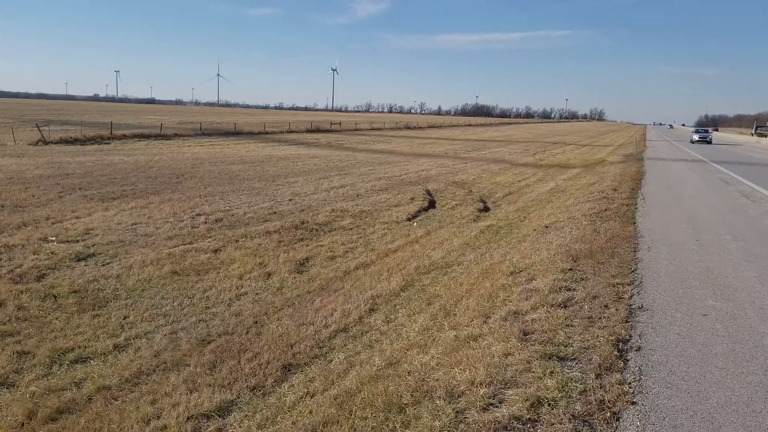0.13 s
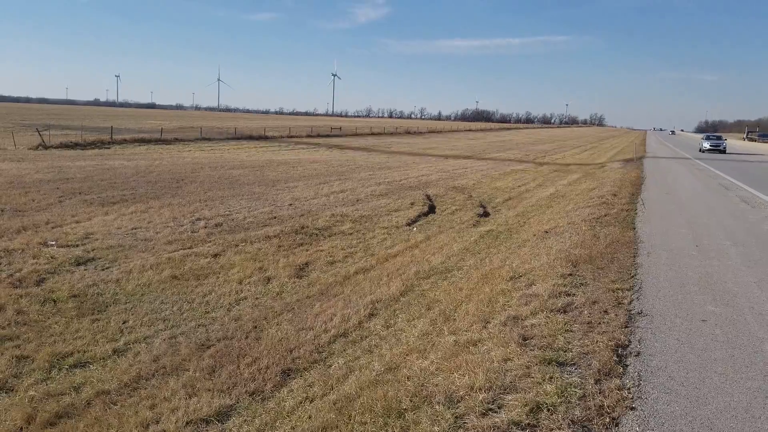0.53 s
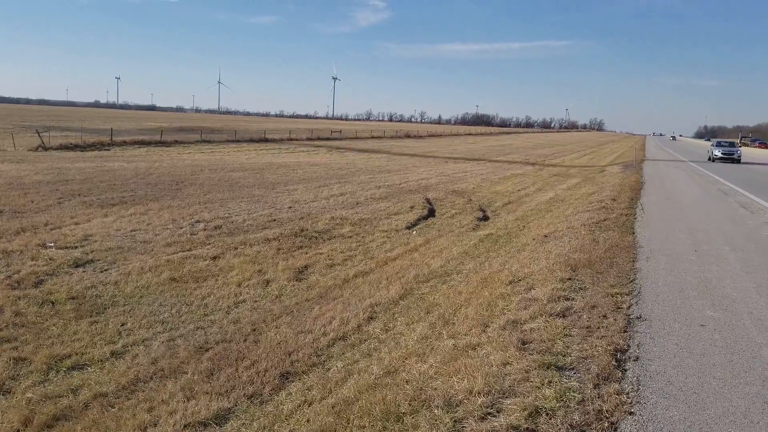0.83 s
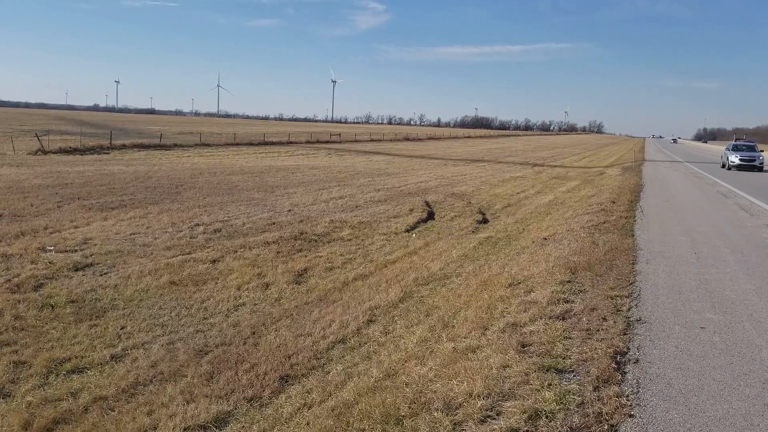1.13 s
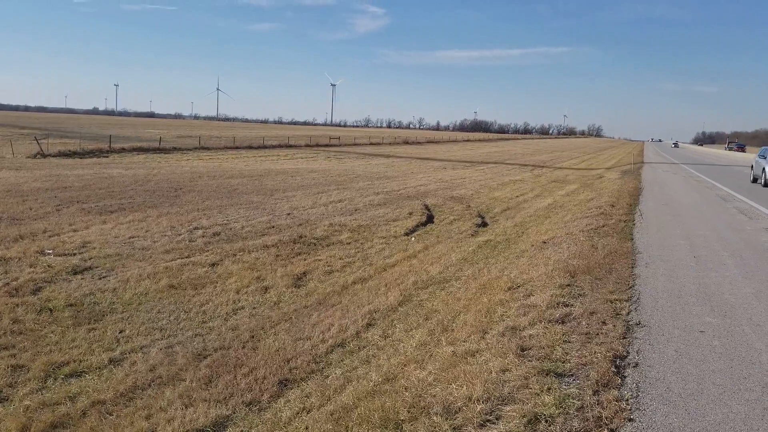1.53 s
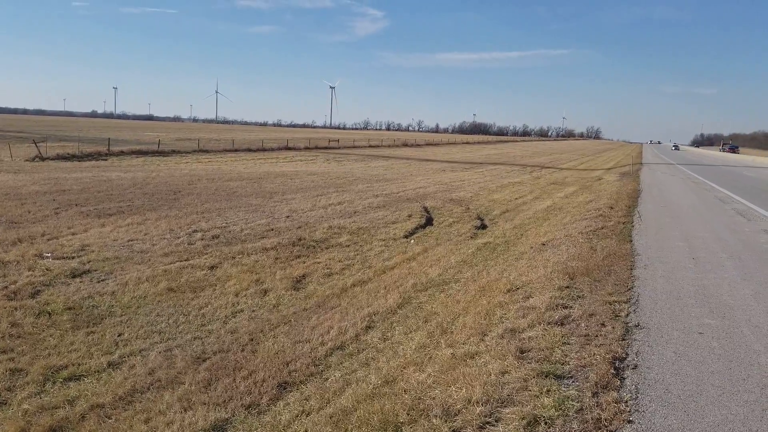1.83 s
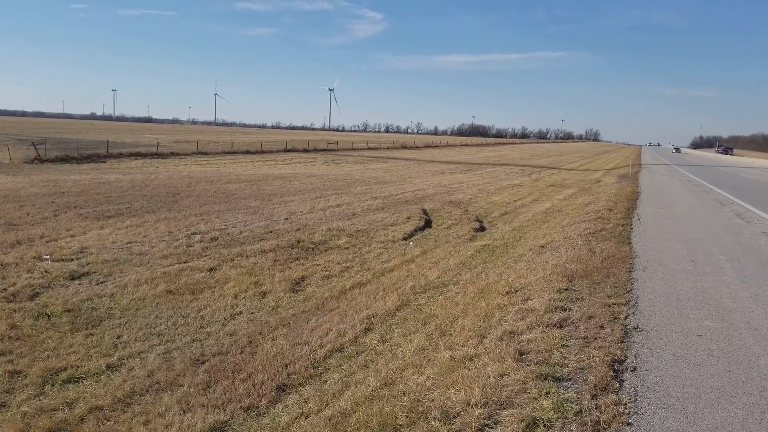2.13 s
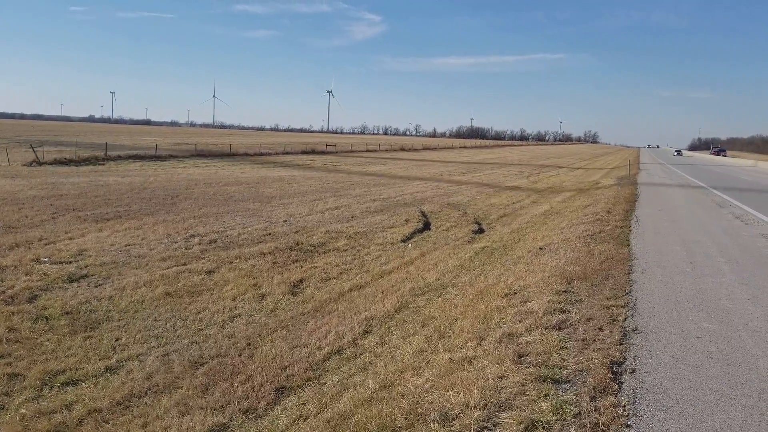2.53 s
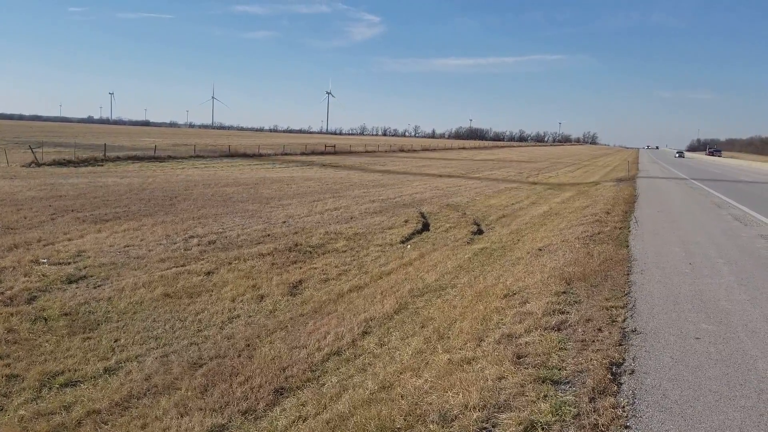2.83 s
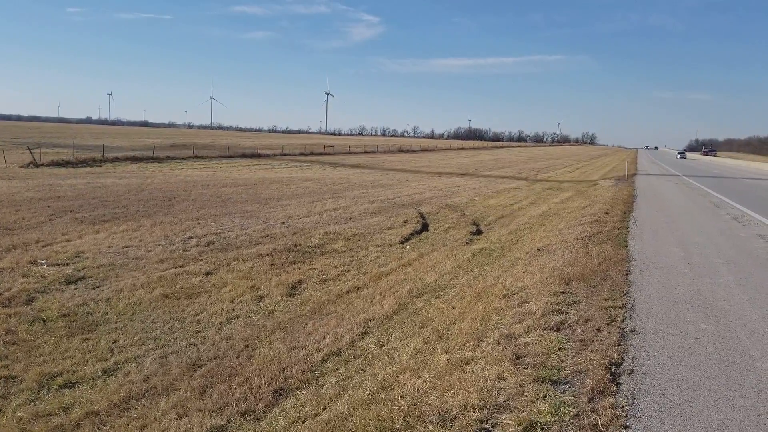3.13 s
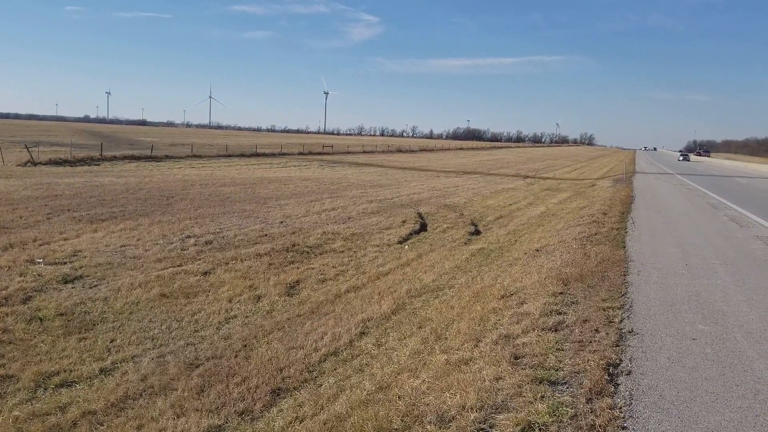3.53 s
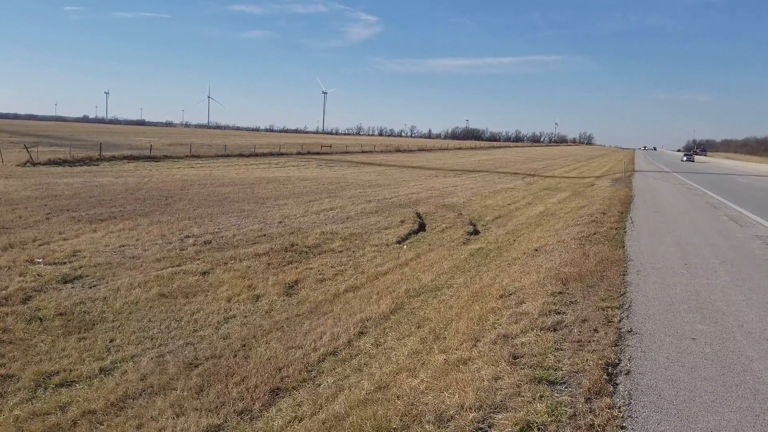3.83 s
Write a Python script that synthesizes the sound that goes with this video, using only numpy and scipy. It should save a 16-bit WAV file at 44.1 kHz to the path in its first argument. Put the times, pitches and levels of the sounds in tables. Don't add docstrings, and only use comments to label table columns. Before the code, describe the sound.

Tyre roar of a first car peaks, then a faster, nearer one follows and recedes; dull far traffic and soft wind buffeting outdoors, picked up by a phone at the roadside.

```python
import sys
import numpy as np
from scipy import signal
from scipy.fft import rfft, irfft, next_fast_len
from scipy.io import wavfile
from scipy.ndimage import uniform_filter1d, map_coordinates

SR = 44100
rng = np.random.default_rng(int(sys.argv[2]) if len(sys.argv) > 2 else 0)


def inscribe(sig):
    pcm = np.round(np.clip(np.atleast_2d(sig).T, -1, 1) * 32767)
    wavfile.write(sys.argv[1], SR, pcm.astype(np.int16))


def volts(x):
    e = np.asarray(x, float) / 20
    return 10 ** e


N = 175518
T = np.arange(N) / SR
SOUND_M_S = 343

# closest_s, speed_m_s, lane_distance_m, level_db (at 1 m), hiss_tilt_db_per_octave, front_louder_db
CAR_PASSES = [
    (1.399, 26, 7.47, 0.5, 0.02, 4),
    (2.548, 30.7, 5.8, 0, 1.32, 3.5),
]
# firing_hz, level_db (at 1 m)
ENGINE_DRONES = [(92.1, -13), (67.2, -9)]
# whine_hz, whine_db, width_octaves, bass_db (when closest)
TREAD_WHINES = [(1296, 2, 0.27, 4), (990, 2, 0.23, -5.5)]
# multiple_of_firing, level_db
FIRING_ORDERS = [(1, 3), (2, -9.5), (3, -3)]
# frequency_hz, level_db
TYRE_ROAR = [(40, -14.5), (130, 5), (450, -5.5), (950, -2.5), (2000, -8), (3300, -19), (7000, -29),
             (16000, -61.5)]
# time_s, level_db, treble_db_per_octave
AIR_CLEARNESS = [(.1, -1, -1.6), (.33, -1.3, -1.5), (.4, -1.6, 3.5), (.75, 0.3, -1.1), (.85, 0.2, 0.1),
                 (1.2, -1.45, 0.9), (1.36, -1.3, -1.4), (1.5, -4.2, 1.3), (1.62, -0.8, 0.4),
                 (1.85, -0.25, 1.8), (2.15, 0.2, -0.1), (2.35, 2.4, -1.14), (2.6, 1.16, -3.5),
                 (2.8, 1.05, -1.9), (3.02, 0.9, 2.3), (3.2, -0.9, 3.3), (3.5, 2, 2.3), (3.95, 9.5, -2)]
# frequency_hz, level_db
FAR_MURMUR = [(35, -22), (65, 9.5), (150, 2), (480, -12.5), (1000, -9), (1600, -12), (3500, -32),
              (9000, -91)]
# frequency_hz, level_db
WIND_THUMP = [(30, -41), (60, 7.5), (110, 7), (200, -15.5), (400, -6), (800, -84)]
# centre_s, level_db, half_width_s, flap_hz
WIND_GUSTS = [(.66, -20.5, 0.045, 81), (1.27, -19.5, 0.039, 75), (1.361, -17, .03, 104),
              (1.66, -23, .025, 130), (1.8, -16.5, .04, 73), (2.029, -19.5, .03, 108),
              (2.169, -23, .03, 55)]
# frequency_hz, loss_db (at the port facing away)
PHONE_SHADOW = [(500, .3), (2000, 2), (8000, 0.5), (14000, 20.5)]
# frequency_hz, share
PORT_SCATTER = [(35, .4), (70, .25), (140, .08), (300, .005), (1000, .02), (2500, .08), (5000, .3),
                (9000, .45)]
# frequency_hz, left_db, right_db
PORT_COLOUR = [(300, -1.6, -2.2), (2230, 2, .5), (4900, -4.8, -4.9), (7800, -0.5, -9), (8330, -1.5, -9),
               (10200, 8, 4.5), (13200, 23.5, 1), (15500, 25, 19)]
# centre_hz, width_hz, left_db, right_db
PORT_RESONANCES = [(12940, 570, -5.5, 15), (8000, 290, 2, 1), (2250, 640, -1.5, 1.5), (5870, 400, -1, 3)]
# frequency_hz, level_db
VERGE_COLOUR = [(200, -0.4), (380, 0.46), (530, -2), (760, 1.92), (1100, 0.04), (1700, 0.16), (2200, -0.67)]

WHEELBASE_M, REAR_DB = 3.63, -2.5
PORT_GAP_M, TURNED_RAD = 0.172, 0.5
AIR_DB_PER_M, AIR_POWER = 0.3, 1.01
CLEAR_HZ = 2500
HORN_DB = -1
GROUND, TYRE_H_M, PHONE_H_M = 0.1, 0.24, 1.417
EXHAUST_DB, ROUGH = 6, 0.018
FAR_DB, FAR_LAG_S, FAR_ALIKE = -29.5, 0.00029, 0.87
BREEZE_DB, LEE_DB = -40, -13
FLAP_DB = -2.5
TICK_S, TICK_DB, TICK_HZ = 3.503, -56, 13000
SELF_DB, TOP_HZ = -94, 15830
START, QUIET = 3070, 0.001
STEP_DB, STEP_S = -18.5, 0.00021


def unit(x):
    return x / np.sqrt(np.mean(abs(x) ** 2) + 1e-20)


def along(points, hz, axis=1):
    columns = np.transpose(points)
    return np.interp(np.log(hz + 1), np.log(columns[0] + 1), columns[axis])


def wobble(rate, t=T):
    knots = rng.standard_normal(size=400)
    return map_coordinates(knots, [t * rate % 390])


def patchy_noises(patchy_db):
    hz, t, z = signal.stft(rng.standard_normal((3, N)), SR, nperseg=1024)
    patches = rng.standard_normal(z.shape[1:])
    patches = uniform_filter1d(patches, size=14, axis=0)
    patches = uniform_filter1d(patches, size=6, axis=1)
    return hz[:, None], t, z * volts(patchy_db * unit(patches))


def at_ports(z, hz, lag_s, share):
    share = np.clip(share, 0, 1)
    turn = np.exp(-1j * np.pi * hz * lag_s)
    common = z[0] * np.array([turn, turn.conj()])
    return np.sqrt(1 - share) * common + np.sqrt(share) * z[1:]


def to_sound(z):
    return signal.istft(z, SR, nperseg=1024)[1][:, :N]


def bearing(t, at_s, speed, lane):
    ahead = speed * (at_s - t)
    r = np.hypot(ahead, lane)
    shift = 1 / (1 - speed * ahead / r / SOUND_M_S)
    right = (lane * np.cos(TURNED_RAD) + ahead * np.sin(TURNED_RAD)) / r
    return r, shift, ahead / r, right


def axle(at_s, speed, lane, db, tilt_db, front_db, tread):
    hz, t, z = patchy_noises(patchy_db=0.96)
    r, shift, front, right = bearing(t, at_s, speed, lane)

    colour = along(TYRE_ROAR, hz / shift) + tilt_db * np.log2(1 + hz / 2000)
    colour = colour - 10 * np.log10(np.mean(volts(2 * along(TYRE_ROAR, hz))))
    whine_hz, whine_db, width, bass_db = tread
    octaves_off = np.log2((hz + 1) / shift / whine_hz)
    colour = colour + whine_db * np.exp(-0.5 * (octaves_off / width) ** 2)
    colour = colour + bass_db * lane / r / (1 + (hz / 300) ** 2)

    lost = AIR_DB_PER_M * r * (hz / 4000) ** AIR_POWER
    s, level_db, treble_db = np.transpose(AIR_CLEARNESS)
    clear = np.interp(t, s, level_db) + np.interp(t, s, treble_db) * np.log2(1 + hz / CLEAR_HZ)
    facing = HORN_DB * front ** 2 + front_db * front
    flutter = 0.6 * wobble(4.83, t) + 0.2 * wobble(10, t)
    bounce = 1 + GROUND * np.exp(-4j * np.pi * hz * TYRE_H_M * PHONE_H_M / r / SOUND_M_S)
    gain = volts(db + colour - lost + facing + clear + flutter) / r * bounce

    sides = np.array([-0.5, 0.5])[:, None, None]
    shadow = volts(along(PHONE_SHADOW, hz) * right * sides)
    roar = at_ports(z, hz, right * PORT_GAP_M / SOUND_M_S, along(PORT_SCATTER, hz))
    return to_sound(gain * shadow * roar)


def engine(at_s, speed, lane, firing_hz, db):
    r, shift, front, right = bearing(T, at_s, speed, lane)
    turns = np.cumsum(firing_hz * shift * (1 + ROUGH * wobble(34))) / SR
    turns = turns + firing_hz * right * PORT_GAP_M / SOUND_M_S * np.array([[-0.5], [0.5]])
    drone = 0
    for order, level_db in FIRING_ORDERS:
        drone = drone + volts(level_db + 2.7 * wobble(9)) * np.sin(2 * np.pi * order * turns)
    return volts(db - EXHAUST_DB * front) / r * drone


def cars():
    total = 0
    for (at_s, speed, lane, db, *tone), motor, tread in zip(CAR_PASSES, ENGINE_DRONES, TREAD_WHINES):
        rear_s = at_s + WHEELBASE_M / speed
        total = total + axle(at_s, speed, lane, db, *tone, tread)
        total = total + axle(rear_s, speed, lane, db + REAR_DB, *tone, tread)
        total = total + engine(at_s, speed, lane, *motor)
    return total


def far_traffic():
    hz, t, z = patchy_noises(patchy_db=-1.5)
    murmur = to_sound(volts(along(FAR_MURMUR, hz)) * at_ports(z, hz, FAR_LAG_S, 1 - FAR_ALIKE))
    return volts(FAR_DB + 0.27 * wobble(2.64)) * unit(murmur)


def wind():
    hz, t, z = patchy_noises(patchy_db=1.5)
    wander = 0.27 * wobble(25)
    gusts, flaps = 0, 0
    for centre_s, db, width_s, flap_hz in WIND_GUSTS:
        shape = volts(db) * np.exp(-0.5 * ((T - centre_s) / width_s) ** 2)
        gusts = gusts + shape
        flaps = flaps + shape * np.sin(2 * np.pi * (flap_hz * (T - centre_s) + wander))
    breeze = volts(BREEZE_DB + 2.5 * np.array([wobble(27), wobble(25)]))
    buffeting = unit(to_sound(volts(along(WIND_THUMP, hz)) * z[1:]))
    rustle = (breeze + gusts * volts([[LEE_DB], [0]])) * buffeting
    return rustle + volts(FLAP_DB + 5.5 * wobble(44.9)) * flaps * volts([[2 * LEE_DB], [0]])


def case_tick():
    u = T - TICK_S
    burst = np.exp(-(u / 0.0001) ** 2) * np.sin(2 * np.pi * TICK_HZ * u)
    return volts(TICK_DB) * burst * volts([[0], [-6]])


def scene():
    return cars() + far_traffic() + wind() + case_tick()


def low_pass(x):
    return signal.sosfilt(signal.butter(12, 16620, fs=SR, output="sos"), x)


def record(dry):
    m = next_fast_len(N + 8192)
    hz = np.fft.rfftfreq(m, 1 / SR)
    left, right = along(PORT_COLOUR, hz, axis=1), along(PORT_COLOUR, hz, axis=2)
    for centre_hz, width_hz, left_db, right_db in PORT_RESONANCES:
        peak = np.exp(-0.5 * ((hz - centre_hz) / width_hz) ** 2)
        left = left + left_db * peak
        right = right + right_db * peak
    colour = along(VERGE_COLOUR, hz) + np.array([left, right])
    hissy = dry + volts(SELF_DB) * rng.standard_normal(dry.shape)
    heard = irfft(rfft(hissy, m) * volts(colour) * (hz < TOP_HZ), m)[:, :N]
    step = volts(STEP_DB) * np.exp(-abs(T - START / SR) / STEP_S) * np.array([[0], [1]])
    opening = np.where(np.arange(N) < START, QUIET, 1)
    return low_pass((heard + step) * opening)


dry = scene()
out = record(dry)
inscribe(out)
```